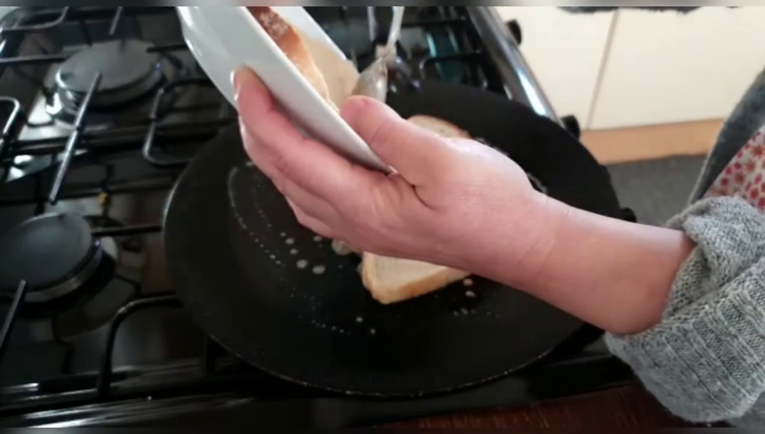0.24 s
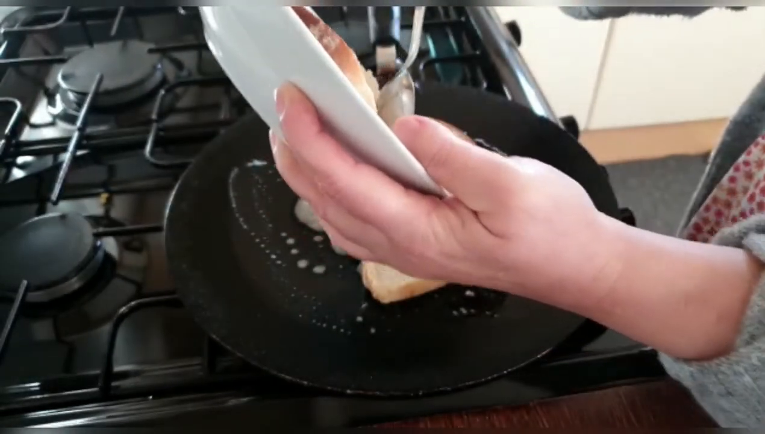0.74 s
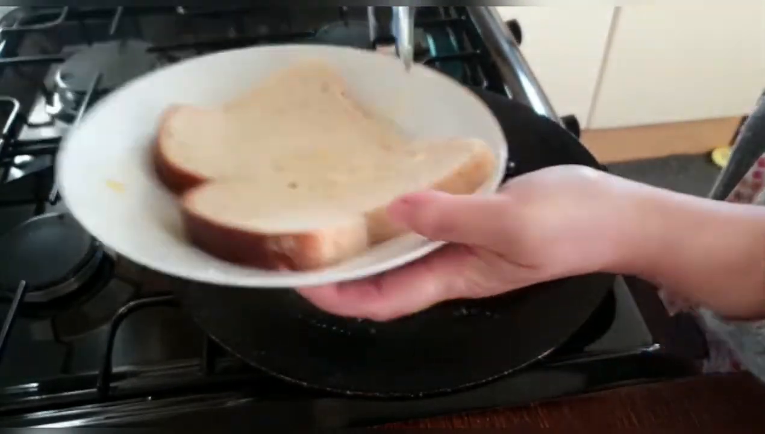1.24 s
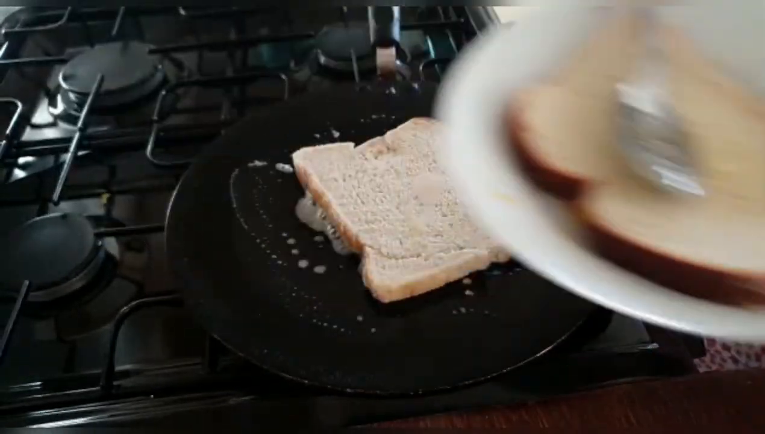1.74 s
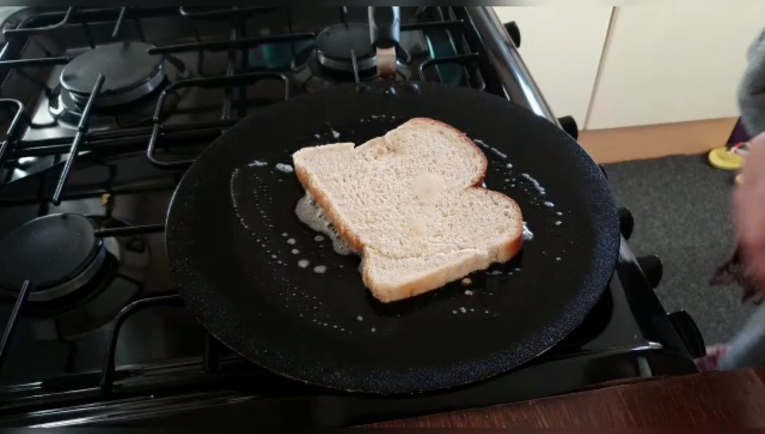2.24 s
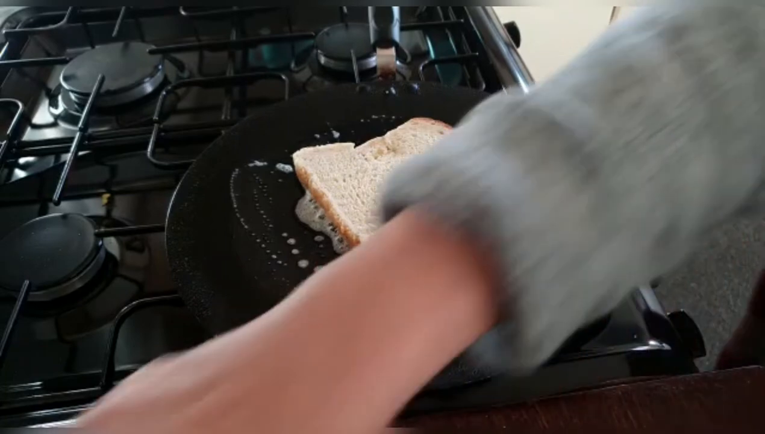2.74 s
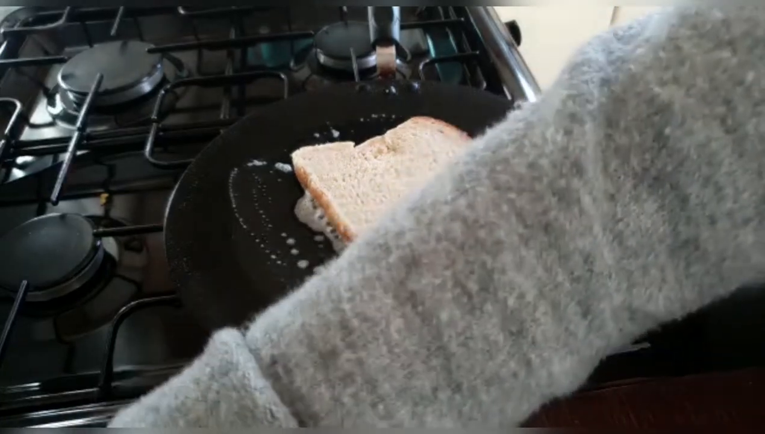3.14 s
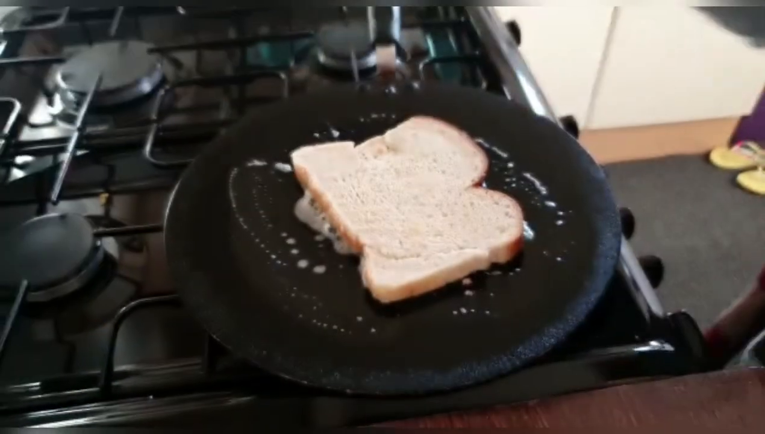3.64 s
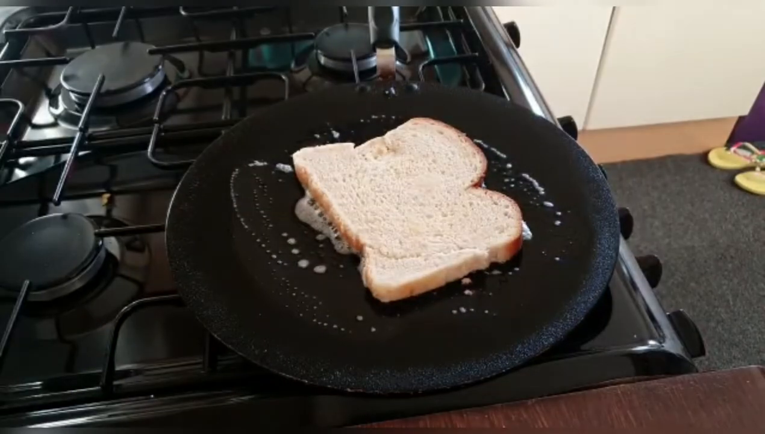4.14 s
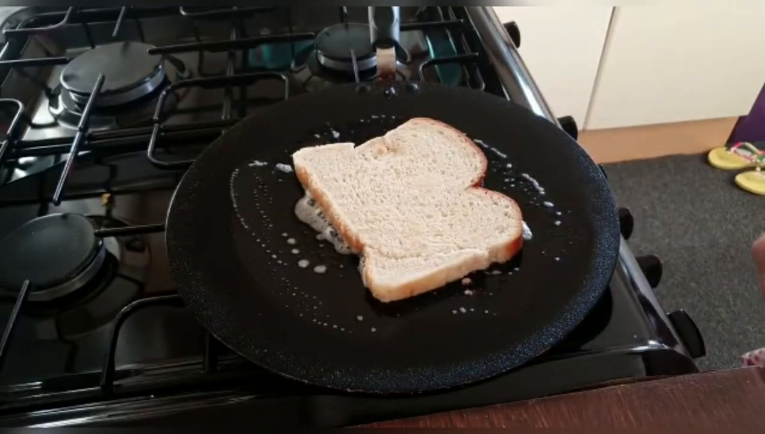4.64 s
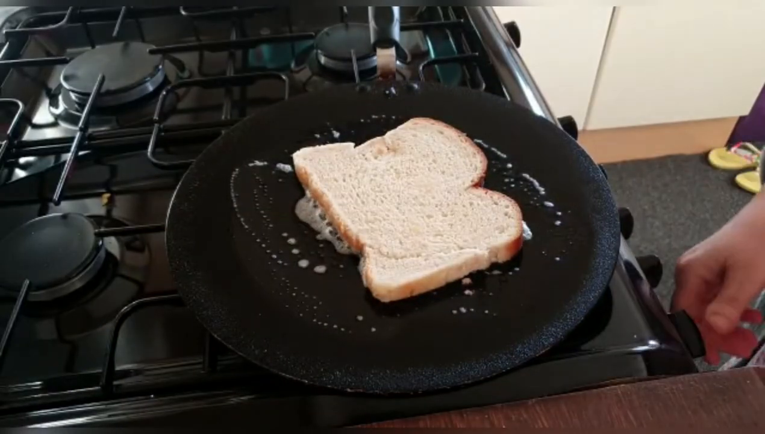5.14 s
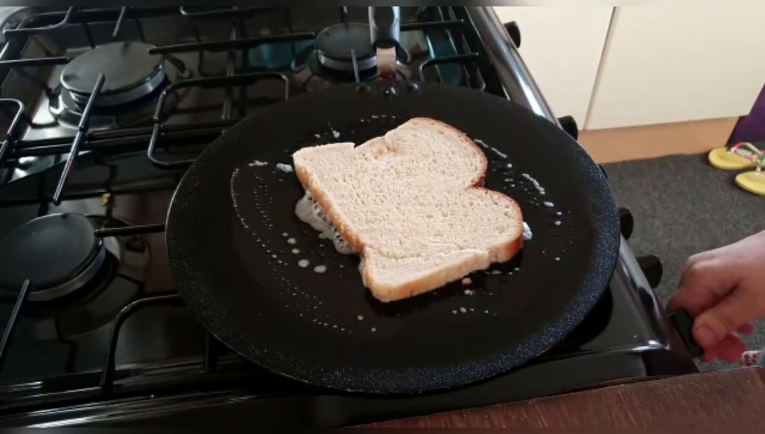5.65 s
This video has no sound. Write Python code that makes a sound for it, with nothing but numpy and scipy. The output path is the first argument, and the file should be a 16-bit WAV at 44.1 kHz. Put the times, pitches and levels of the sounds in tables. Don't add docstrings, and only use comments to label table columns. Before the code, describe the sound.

In a humming, hissing kitchen, a light spoon clink, a plate thudding and grinding across a wooden counter, then sparse fat ticks and a faint wipe.

```python
import sys
import numpy as np
from scipy import signal
from scipy.io import wavfile
from scipy.ndimage import uniform_filter1d

SR = 44100
rng = np.random.default_rng(int(sys.argv[2]) if len(sys.argv) > 2 else 0)


def amplitude_ratio(level_db):
    exponent = np.asarray(level_db, float) / 20
    return 10 ** exponent


def pcm_store(signal):
    levels = np.round(np.clip(np.atleast_2d(signal), -1, 1) * 32767)
    wavfile.write(sys.argv[1], SR, levels.astype(np.int16).T)


N = 259831

# f/Hz, partner f/Hz
PLATE_PAIRS = [(1480, 1513), (2326, 2338), (2860, 2900), (3278, 3311), (3725, 3950), (4387, 4427),
               (5597, 5612), (6971, 7000), (8263, 8460), (8527, 9528), (10089, 10135), (10430, 10790)]
# level under the spoon/dB, level when set down/dB, partner level/dB, t60/s
PLATE_RINGING = [(-4, -28, -5, 0.094), (0, 5.5, -1, 0.21), (-7, -14, 2.5, 0.059), (3, 4, 6, 0.12),
                 (-5, 0.5, -1, 0.13), (-2, -2, 1, 0.18), (-9.5, -5.5, 6, 0.078), (-15, -9, -6, 0.1),
                 (-3, -17, 3, 0.067), (-20, 9, -6, 0.049), (-2, 2, 4, 0.044), (-14, -5, 2, .05)]
# t/s, peak level/dB, treble tilt/dB per octave, left-right/dB, left lag/samples
SPOON_CONTACTS = [
    (1.8750, -35, -2.5, 7.5, 2.1),
    (1.880, -40.5, 6, 14.5, 2),
    (1.906, -45, -2, -5, 1.5),
]
# t/s, peak level/dB, treble tilt/dB per octave, left-right/dB, left lag/samples
SET_DOWN_CONTACTS = [
    (2.5092, -35, -0.5, 7, 7),
    (2.515, -37.5, 1.5, 6.6, 7),
    (2.536, -34.5, -3, 2.5, 7),
    (2.547, -39, -0.5, 8.3, 7),
    (2.575, -42.5, 2.5, 2.9, 7),
    (2.62, -58, 6, 3.6, 7),
]


def plate():
    out = np.zeros((2, N))
    hz, partner_hz = np.transpose(PLATE_PAIRS)
    *mode_db, partner_db, t60 = np.transpose(PLATE_RINGING)
    for contacts, balance_db in zip((SPOON_CONTACTS, SET_DOWN_CONTACTS), mode_db):
        for s, db, tilt_db, pan_db, lag in contacts:
            level_db = db + balance_db + tilt_db * np.log2(hz / 3300) - 9.0
            main = ring(hz, level_db, t60, rise_s=0.00019)
            partner = ring(partner_hz, level_db + partner_db, t60, rise_s=0.00017)
            add(out, s, main + partner, pan_db, lag)
    return out


COUNTER_MODES_HZ = [388, 470, 558, 630, 780, 820, 940, 1030, 1106, 1260, 1468, 1575, 1692, 1861, 2035, 2255,
                    2670, 2990, 3290, 3600, 4200]
# level at first blow/dB, level at second/dB, t60/s
COUNTER_RINGING = [(-28.5, -21.5, 0.053), (-24.5, -15.5, 0.037), (-9.5, -7, 0.035), (-10.5, -13.5, 0.042),
                   (-17, -9, 0.045), (-12, -12.5, 0.042), (-11.5, -18, 0.037), (-14, -16, 0.039),
                   (-17, -17.5, 0.049), (-28, -19, 0.031), (-15, -13.5, .025), (-13.5, -12.5, 0.018),
                   (-30, -11, 0.012), (-27, -10, 0.014), (-30, -15.5, 0.02), (-23, -14, 0.012),
                   (-20.5, -18, 0.012), (-31, -28.5, 0.029), (-43, -23.5, 0.0098), (-37.5, -32, 0.035),
                   (-34, -32, 0.017)]
# f/Hz, level at first blow/dB, level at second/dB, t60/s
CABINET_MODES = [(119.5, -8.5, -9, 0.2), (167.5, -21, -25, 0.27), (239, -28.5, -31, 0.13),
                 (289.5, -24.5, -23, 0.15)]
# t/s, left-right/dB, room level/dB, room level of the boom/dB
COUNTER_BLOWS = [
    (2.5086, 3, -2.5, -14),
    (3.1145, 2.5, -5, -18),
]
BLOW_LAG, BLOW_RISE_S = 7.4, 0.00072


def counter():
    out, hz = np.zeros((2, N)), np.array(COUNTER_MODES_HZ)
    top, box = np.transpose(COUNTER_RINGING), np.transpose(CABINET_MODES)
    for k, (s, pan_db, room_db, boom_db) in enumerate(COUNTER_BLOWS):
        turns = rng.standard_normal((2, len(hz))) * np.clip(hz / 1100, 0, 1.2) ** 2
        knock, boom = np.zeros((2, 2, SR // 2))
        for port, start in enumerate((round(BLOW_LAG), 0)):
            modes = ring(hz, top[k], top[2], BLOW_RISE_S, turns[port])
            knock[port, start:start + SR // 4] = amplitude_ratio(pan_db * (2.0 - port)) * modes
        add(boom, 0.0002, -ring(box[0], box[1 + k], box[3], 0.35 / box[0]), 1.5, -4)
        reverb = room(amplitude_ratio(room_db) * knock + amplitude_ratio(boom_db) * boom)
        start = round(s * SR)
        out[:, start:start + SR // 2] += knock + boom + reverb
    return out


# start t/s, level/dB, rise/s, fade/dB per s, length/s
SLIDE_STROKES = [
    (2.6, -34.5, .01, 28, 0.335),
    (2.915, -34, 0.014, 17, .13),
    (3.02, -35.5, 0.017, 48, .12),
]
# f/Hz, level/dB
GRIND_COLOUR = [(70, -11), (110, -0.5), (200, -20.5), (290, -0.5), (380, -7), (600, -10.5), (800, -13),
                (1200, -20.5), (1550, -17), (1800, -27.5), (2800, -36), (6000, -100)]
# start t/s, level/dB, rise/s, fade/dB per s, length/s
WIPE_STROKES = [
    (3.5, -56.5, 0.15, 10, .85),
]
# f/Hz, level/dB
CLOTH_COLOUR = [(900, -25), (1400, -9), (1650, 5), (2000, 3), (2600, -24)]


def slide():
    grind = rub(SLIDE_STROKES, GRIND_COLOUR, patchy_db=3.5)
    return grind + rub(WIPE_STROKES, CLOTH_COLOUR, patchy_db=4.0)


def rub(strokes, colour, patchy_db):
    out, first = np.zeros((2, N)), round(strokes[0][0] * SR)
    out[:, first:first + SR] = diffuse(lambda hz: read(colour, hz), patchy_db, count=SR)
    t, gain = np.arange(N) / SR, np.zeros(N)
    for s, db, rise_s, fade_db, length in strokes:
        since = t - s
        pressure = np.clip(np.minimum(since / rise_s, (length - since) / 0.029), 0, 1)
        gain += amplitude_ratio(db - fade_db * since) * pressure
    return out * gain


# t/s, level under the first blow/dB
RIM_ROCKS = [
    (2.681, -17),
    (2.765, -25),
]


def rocking():
    out, box = np.zeros((2, N)), np.transpose(CABINET_MODES)
    for s, db in RIM_ROCKS:
        level_db = box[1] + db + 7.3 * np.log2(box[0] / box[0, 0])
        add(out, s, ring(box[0], level_db, 0.8 * box[3], 0.35 / box[0]), 1.5)
    return out


# t/s, peak level/dB, left-right/dB, kind
FAT_TICKS = [(0.3104, -35, 15, "spit"), (1.058, -35.5, 16, "spit"), (1.978, -33, 12, "spit"),
             (2.5088, -29.5, 13, "clack"), (2.514, -27, -5, "fizz"), (2.617, -37.5, 10, "fizz"),
             (2.929, -40, 4, "scuff"), (3.115, -35, 8, "tap"), (3.117, -40, 9, "fizz"),
             (3.347, -36, 12, "spit"), (4.065, -39.5, 4, "clack"), (4.3695, -23, 4, "snap"),
             (4.3692, -33.5, 6, "pop")]
KINDS_OF_TICK = {"spit": (8100, 8400, .008, 13), "clack": (5400, 9100, 0.055, 10),
                 "fizz": (9500, 1900, .035, 12), "scuff": (530, 520, 0.13, 6), "tap": (5200, 3000, .03, 12),
                 "snap": (10050, 3800, .045, 21.7), "pop": (3400, 4500, .012, 13)}


def ticks():
    out, t = np.zeros((2, N)), np.arange(2000) / SR
    for s, db, pan_db, kind in FAT_TICKS:
        hz, width_hz, t60, click_db = KINDS_OF_TICK[kind]
        puff = rng.standard_normal(len(t)) * amplitude_ratio(-60 * t / t60)
        puff[0] += amplitude_ratio(click_db)
        edges = np.clip([hz - width_hz / 2, hz + width_hz / 2], 200, 20000)
        puff = signal.sosfilt(signal.butter(2, edges, "bandpass", fs=SR, output="sos"), puff)
        add(out, s, amplitude_ratio(db) * puff / abs(puff).max(), pan_db)
    return out


# middle t/s, peak level/dB, length/s
FLAME_GUSTS = [(0.0, -46.5, 0.17), (.17, -46, 0.13), (0.323, -48, 0.086), (.66, -38.5, 0.65),
               (1.06, -42, 0.14), (1.225, -42, .13), (1.41, -45, .22), (1.59, -42, .19), (1.78, -44, .14),
               (1.93, -36, 0.12), (2.155, -46, .22), (2.358, -43.5, 0.32), (2.6, -45, 0.24),
               (2.8, -43.5, 0.35), (3.01, -40.5, .14), (3.14, -47, .15), (3.37, -46.5, 0.2),
               (3.646, -43, .26), (3.944, -45, 0.47), (4.2, -45.5, 0.084), (4.31, -48, .14),
               (4.5, -41, 0.21), (4.883, -41.5, 0.64), (5.145, -39.5, 0.29), (5.39, -39, .16),
               (5.6, -36.5, 0.18), (5.786, -38, 0.22)]
RUMBLE_HZ, RUMBLE_SPREAD_HZ = 49.7, 1.45


def rumble():
    t, out = np.arange(N) / SR, np.zeros(N)
    for k, (s, db, length) in enumerate(FLAME_GUSTS):
        near = slice(max(round((s - length) * SR), 0), round((s + length) * SR))
        since = t[near] - s
        turns = RUMBLE_HZ * t[near] + RUMBLE_SPREAD_HZ * rng.standard_normal() * since
        swell = amplitude_ratio(db) * np.exp(-(since / (0.4 * length)) ** 2)
        out[near] += (-1) ** k * swell * np.sin(2 * np.pi * turns)
    return np.sqrt(2) * out * amplitude_ratio(np.array([[0.3], [-0.3]]))


# multiple of the mains, rms level/dB, left-right/dB
HUM_MULTIPLES = [(2, -48.5, 0.77), (6, -62, 0.75), (7, -63, 1), (8, -68.5, 1), (9, -68.5, 1), (11, -58, 1),
                 (13, -66, 0.58), (18, -67.5, 1)]
MAINS_HZ = 50.06


def hum():
    t, out = np.arange(N) / SR, np.zeros((2, N))
    knots = np.linspace(0, t[-1], num=60)
    for k, db, pan_db in HUM_MULTIPLES:
        swell, drift = (np.interp(t, knots, v) for v in rng.standard_normal((2, 60)))
        tone = np.sin(2 * np.pi * k * MAINS_HZ * t + 0.76 * drift)
        add(out, 0, np.sqrt(2) * amplitude_ratio(db + 1.47 * swell) * tone, pan_db)
    return out * amplitude_ratio(0.7 + 1.32 * ducking())


# f/Hz, level/dB per Hz
AIR_COLOUR = [(28, 8), (55, 19), (125, 21.5), (200, 6.5), (260, 17), (420, 8.5), (750, 12), (1050, 5),
              (2050, -5), (4500, -2), (6500, -11), (8200, -0.5), (11000, -3.5), (12200, -15.5)]
# f/Hz, width/Hz, level/dB
AIR_RESONANCES = [(167, 18, 4), (1447, 368, 8), (2410, 360, 4.5), (3240, 560, 5), (3947, 210, 8.5),
                  (4940, 210, 5.5), (7500, 670, -7.5), (10170, 830, 6.5)]
AIR_DB = -45.5


def air():
    def colour(hz):
        bumps = sum(db * np.exp(-0.5 * ((hz - f) / w * 2) ** 2) for f, w, db in AIR_RESONANCES)
        return read(AIR_COLOUR, hz) + bumps
    return amplitude_ratio(AIR_DB + ducking()) * diffuse(colour, patchy_db=1.69)


DUCK_DB, DUCK_FALL_S, DUCK_HOLD_S, RECOVER_DB_PER_S = 3.5, 0.26, 0.36, 2


def ducking():
    since = np.arange(N) / SR - np.array(COUNTER_BLOWS)[:, :1]
    fall = DUCK_DB * np.clip(since / DUCK_FALL_S, 0, 1)
    recovery = RECOVER_DB_PER_S * np.maximum(since - DUCK_HOLD_S, 0)
    return -np.maximum((fall - recovery).max(0), 0)


# f/Hz, likeness of the two
PORT_LIKENESS = [(60, 2), (130, 0.7), (270, 0.72), (570, 0.36), (1210, -0.13), (2570, 0), (5450, 0.02),
                 (11600, -0.08)]
# f/Hz, left-right/dB
PORT_TILT = [(60, 0), (110, -1), (190, 3), (350, -2.5), (620, 2), (1120, 1.5), (2000, 6), (3590, 6.5),
             (6440, 12.5), (11600, 1.5)]


def diffuse(shape_db, patchy_db, count=N):
    frames, hz = count // 512 + 5, np.fft.rfftfreq(2048, 1 / SR)
    a, b, c, d, patches = rng.standard_normal((frames, 1025, 5)).T
    patches = uniform_filter1d(patches, size=8, axis=1)
    patches = evened(uniform_filter1d(patches, size=16, axis=0))
    left = a + 1j * b
    right = part_alike(left, c + 1j * d, hz)
    half = amplitude_ratio(read(PORT_TILT, hz) / 2)[:, None]
    z = np.array([left * half, right / half]) * amplitude_ratio(shape_db(hz)[:, None] + patchy_db * patches)
    return evened(signal.istft(z, nperseg=2048, noverlap=1536)[1][:, :count])


def part_alike(left, other, hz):
    same = np.clip(read(PORT_LIKENESS, hz), -1, 1)[:, None]
    return same * left + np.sqrt(1 - same ** 2) * other


# f/Hz, t60/s
ROOM_T60 = [(100, 0.74), (300, 0.49), (1000, 0.43), (3000, 0.4), (8000, 0.25)]


def room(x, gap=200):
    taps = np.zeros((2, SR // 2))
    at = np.arange(gap, SR // 2 - 20, 20)
    at = at + rng.integers(0, 20, (2, len(at)))
    np.put_along_axis(taps, at, rng.choice([-1., 1.], at.shape), 1)
    hz, t, z = signal.stft(taps, SR, nperseg=512)
    z[1] = part_alike(z[0], z[1], hz)
    decay = amplitude_ratio(-60 * t / read(ROOM_T60, hz)[:, None])
    tail = signal.istft(z * decay, SR, nperseg=512)[1]
    return signal.oaconvolve(x, tail / np.linalg.norm(tail[0]), axes=1)[:, :x.shape[1]]


def ring(hz, db, t60, rise_s, turn=0):
    t = np.arange(SR // 4)[:, None] / SR
    onset = (1 - np.exp(-t / rise_s)) ** 2
    return -(amplitude_ratio(db - 60 * t / t60) * np.sin(2 * np.pi * hz * t + turn) * onset).sum(1)


def add(mix, s, sound, pan_db, lag=0):
    for port, side in enumerate((1, -1)):
        start = round(s * SR + side * lag / 2)
        part = mix[port, start:][:len(sound)]
        part += amplitude_ratio(side * pan_db / 2) * sound[:len(part)]


def evened(x):
    return x / np.sqrt(np.mean(x ** 2) + 1e-20)


def read(points, hz):
    f, value = np.transpose(points)
    return np.interp(np.log(hz + 1), np.log(f + 1), value)


def scene():
    bright = plate() + ticks()
    struck = counter() + slide() + rocking()
    background = rumble() + hum() + air()
    return bright + amplitude_ratio(-4.5) * room(bright) + struck + background


def low_pass(x):
    return signal.sosfilt(signal.butter(12, 12150, fs=SR, output="sos"), x)


def record(dry):
    soft = 1.3 * np.tanh(dry / 1.3)
    roll_off = signal.cheby1(8, 1, 11600, fs=SR, output="sos")
    dull = signal.sosfilt(roll_off, soft)
    return low_pass(np.clip(dull, -0.99, 0.99))


dry = scene()
out = record(dry)
pcm_store(out)
```